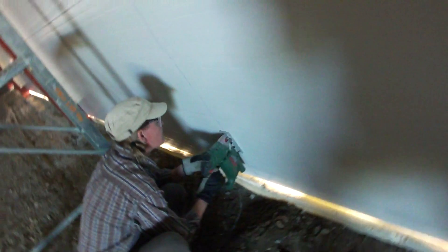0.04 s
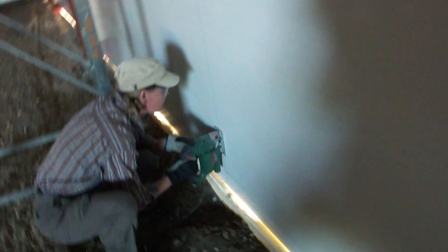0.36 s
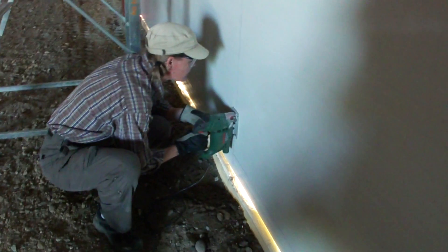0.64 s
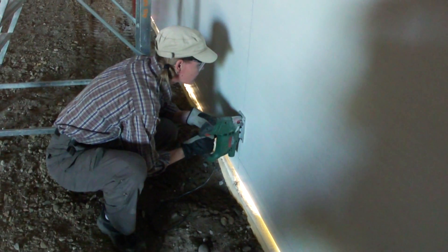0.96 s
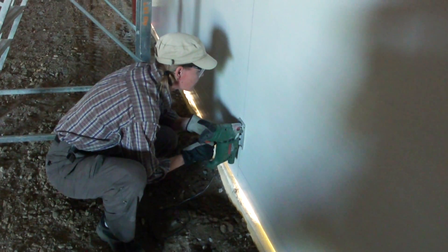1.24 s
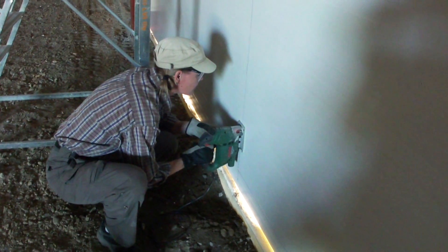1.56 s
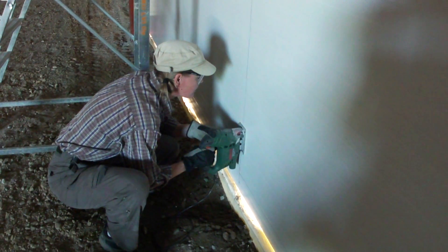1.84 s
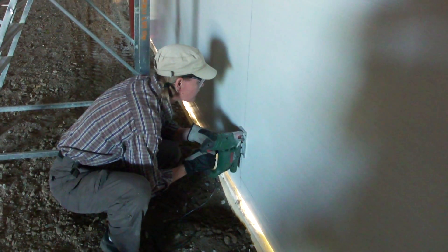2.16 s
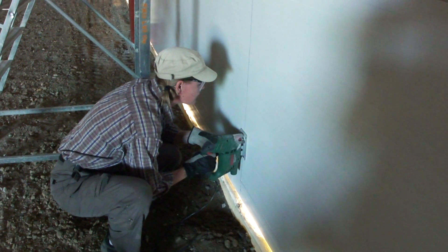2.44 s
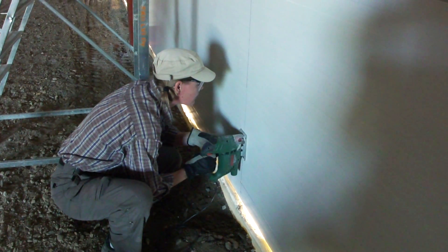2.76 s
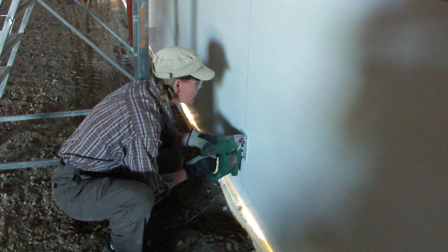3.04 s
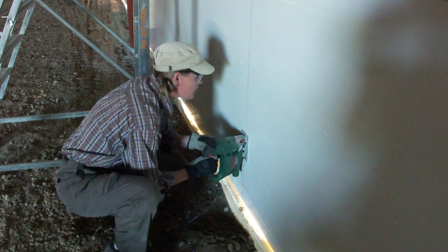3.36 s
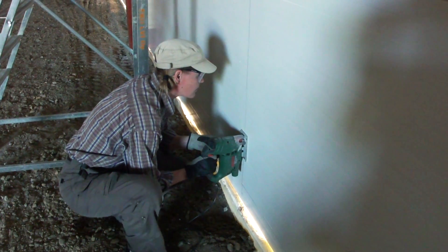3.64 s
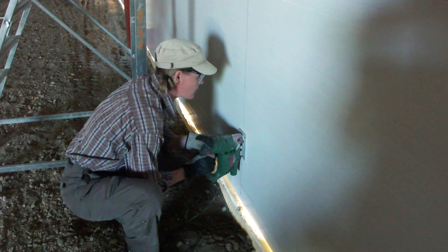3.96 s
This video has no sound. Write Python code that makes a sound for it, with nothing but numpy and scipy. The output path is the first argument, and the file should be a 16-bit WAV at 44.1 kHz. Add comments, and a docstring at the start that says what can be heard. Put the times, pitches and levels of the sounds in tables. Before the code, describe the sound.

A reciprocating power saw cuts a sheet metal wall panel close to the microphone. Its rapid strokes rasp and squeal while the sheet rings and rattles. Near the end the saw speeds up slightly as the load eases.

```python
"""A reciprocating power saw cuts a sheet metal wall panel, close up, at about 46 strokes a second.
Each stroke rasps the teeth through the cut, makes the edge squeal and the blade zing, knocks the saw
against the sheet and keeps the panel ringing. Rattle, hiss and the hum of the saw body fill the gaps.
Near the end the load eases: the saw speeds up a little, the low ring dips and rattle comes forward."""
import sys
import numpy as np
from scipy import signal
from scipy.fft import rfft, irfft, next_fast_len
from scipy.io import wavfile
from scipy.ndimage import uniform_filter1d, map_coordinates

SR = 44100
rng = np.random.default_rng(int(sys.argv[2]) if len(sys.argv) > 2 else 0)


def to_wav(s):
    """Save 16-bit WAV."""
    ch = np.atleast_2d(s).T  # columns
    pcm = np.round(np.clip(ch, -1, 1) * 32767)  # PCM
    wavfile.write(sys.argv[1], SR, pcm.astype(np.int16))


N = 176400

# Pace of the saw: time_s, strokes_per_s
STROKE_RATE = [(0.0, 45.81), (0.45, 45.98), (0.85, 45.81), (1.1, 45.56), (1.38, 45.91), (1.63, 45.43),
               (2.15, 45.87), (2.8, 45.38), (3.05, 45.52), (3.3, 46.45), (3.5, 46.95), (3.7, 47.03),
               (3.88, 46.81), (4.0, 46.29)]
# Faders of the friction layers: time_s, teeth_db, squeal_db, rattle_db, hiss_db
FRICTION_LEVELS = [(.05, -27.5, -26, -25, -30), (.3, -28, -28, -22.5, -28.5),
                   (.65, -28.5, -24.5, -22.5, -30), (.95, -26.5, -24.5, -23.5, -29.5),
                   (1.12, -29, -25.5, -22.5, -32.5), (1.38, -26.5, -27, -21, -29),
                   (1.57, -29.5, -34.5, -23, -30.5), (1.85, -26.5, -33.5, -21, -29),
                   (2.25, -26, -26, -21.5, -28.5), (2.42, -30, -28, -24.5, -31), (2.85, -30, -28, -26, -31),
                   (3.1, -32, -30.5, -22.5, -29), (3.52, -31.5, -52, -19, -25),
                   (3.75, -31, -35, -22, -29.5), (3.87, -25.5, -32, -22, -29), (4, -28, -24.5, -24, -28)]
# Tone of each friction layer: frequency_hz, relative_db
TEETH_EQ = [(1500, -47), (3400, -10), (4600, -14), (5800, -1.5), (6800, -0.5), (7300, -0.5), (8200, 1),
            (9800, -5), (11200, -9), (12800, -56), (14500, -15), (15500, -17.5)]
SQUEAL_EQ = [(1300, -25.5), (1800, -15.5), (2150, -13), (2450, 0.5), (2620, 7.5), (2780, -9.5), (3100, -20),
             (5000, -37)]
RATTLE_EQ = [(20, -42), (65, -47), (130, -29.5), (250, -19), (480, -12.5), (750, -3), (950, 0),
             (1120, -0.5), (1400, -4), (1800, -2), (2200, -5), (2650, -10), (3100, -29), (5000, -26)]
HISS_EQ = [(1500, -27), (3400, -5), (4600, -15), (5800, 3.5), (6800, 1), (8200, 2), (9800, -2), (11200, -9),
           (12800, -31), (14500, -11), (15500, -12)]
# Thin ring of the blade: time_s, level_db, pitch_hz
BLADE_RESONANCE = [(.05, -33, 6320), (.7, -34.5, 6540), (1.2, -43, 6950), (2.1, -39, 6900),
                   (2.4, -33, 6880), (2.9, -35.5, 6800), (3.2, -43, 6850), (4, -52, 6640)]
# Panel resonances as the cut advances: time_s, lower_db, upper_db, lower_pitch_ratio, upper_pitch_ratio
PANEL_MOTION = [(.05, -29, -22, 0.99, 0.93), (.45, -25, -21.5, 1.03, .93), (.95, -18.5, -22, 1.017, 0.997),
                (1.22, -22, -24.5, 1.006, 0.99), (1.45, -16.5, -23, 0.98, 1.01),
                (1.65, -18, -22, 1.033, 1.02), (2.0, -18.5, -23, 0.98, 1.05), (2.28, -19, -20, 1.03, 1.01),
                (2.5, -22, -22, 0.99, 1.02), (2.75, -21.5, -19.5, 1.016, 1), (3.2, -23, -24.5, 1.046, 1.02),
                (3.55, -27, -21.5, 0.92, .96), (3.85, -35, -21.5, 0.97, 0.987), (4, -22, -16.5, 1.02, 1.06)]
# Shape of the panel's two resonance groups: frequency_hz, relative_db
LOWER_RESONANCES = [(500, -39), (640, -18), (780, -15), (865, -5.5), (915, -17.5), (960, -1), (1005, 2.5),
                    (1050, -3.5), (1100, -11.5), (1200, -28)]
UPPER_RESONANCES = [(1080, -26.5), (1140, -16), (1190, -6.5), (1240, -7), (1280, -2), (1325, 3.5),
                    (1375, -4.5), (1420, -8), (1470, -5.5), (1600, -10.5), (1800, -22.5), (2200, -22)]
# Knocks as the teeth bite and in mid stroke: time_s, bite_db, mid_db
KNOCK_LEVELS = [(.05, -47, -24.5), (.3, -50, -24), (.7, -75, -24.5), (1.3, -35, -24), (1.5, -26, -31),
                (1.75, -35, -31), (2.1, -26, -26), (2.3, -22, -23), (2.48, -26, -22.5), (2.7, -23.5, -26),
                (3.03, -23, -33), (3.15, -34, -27), (3.45, -30, -25), (3.65, -47, -21), (4, -42, -22.5)]
# Tone of a knock through the sheet: frequency_hz, relative_db
KNOCK_EQ = [(60, -61), (200, -44), (500, -28.5), (850, -14), (1100, -6.5), (1320, 4), (1550, -5),
            (1900, -17), (2600, -23), (3200, -48.5), (8000, -40.5)]
# Load on the saw: time_s, hum_gain_db, ease_share (0 is full load)
SAW_LOAD = [(.05, -3, 0), (.5, -1, 0.2), (1.2, -0.5, 0.1), (1.5, 0, 0.02), (1.9, 4, 0.1), (2.3, 2, 0.14),
            (2.85, -1, 0.05), (3.2, 2, 0.86), (3.6, -2, 0.95), (4, 1, 0.7)]
# Shaking of the saw body: stroke_harmonic, loaded_db, eased_db
BODY_HARMONICS = [(2, -55, -56.5), (3, -74, -66), (4, -49, -50), (5, -44, -50), (6, -45.5, -61.5),
                  (7, -59, -41), (8, -47.5, -49), (9, -57.5, -53), (10, -49, -43)]
# How alike the two channels sound: frequency_hz, likeness_share
STEREO_LIKENESS = [(100, 1), (1000, 1), (2500, 0.91), (4500, 1), (8000, 0.77), (14000, 0.38)]
# Stereo balance: frequency_hz, left_minus_right_db
STEREO_TILT = [(60, 0), (200, 2), (700, 3), (1290, 2.5), (2380, 0.4), (4400, -1), (8120, 2), (15000, -1)]
# Stereo phase: frequency_hz, left_lead_rad
STEREO_LEAD = [(100, -0.74), (1000, 0.077), (2000, -0.3), (3100, 0.027), (6500, -0.29), (8000, 0.049),
               (11000, -0.41), (15000, -0.87)]
# Gaps in the treble: centre_hz, half_width_hz
TREBLE_NOTCHES = [(3010, 164), (4000, 190), (5010, 202), (12200, 1500), (13500, 1750)]


def tooth_pressure(strokes, peak_at=.48, width=.093, tail_gain=.13, tail_length=.18):
    """The teeth press in once a stroke, a swell with a short tail; timings are shares of a stroke."""
    offset = (strokes - peak_at + .5) % 1 - .5
    swell = np.exp(-(offset / width) ** 2)
    decay = np.exp(-np.mean(np.diff(strokes)) / tail_length)
    tail = signal.lfilter([1 - decay], [1, -decay], swell)
    return unit(np.sqrt(swell + tail_gain * tail))


def roughness(strokes, memory, fresh):
    """Bumps along the blade's path recur stroke after stroke, wear away and blend with fresh noise."""
    bumps = rng.standard_normal((220, 960))  # one row a stroke
    renewal = np.sqrt(1 - memory ** 2)
    worn, _ = signal.lfilter([renewal], [1, -memory], bumps[1:], axis=0, zi=memory * bumps[:1])
    path = map_coordinates(worn.ravel(), [strokes * worn.shape[1]], order=3)
    return np.sqrt(1 - fresh) * unit(path) + np.sqrt(fresh) * rng.standard_normal(N)


def chips(spread_db, samples):
    """Grit: the strength varies from chip to chip, each a few samples long."""
    return amp(spread_db * unit(uniform_filter1d(rng.standard_normal(N), samples)))


def teeth_rasp(strokes, pressure):
    """The teeth scrape through the cut in one bright burst a stroke."""
    scrape = pressure * chips(spread_db=1, samples=24) * roughness(strokes, memory=.824, fresh=.46)
    return unit(colour(scrape, TEETH_EQ))


def edge_squeal(strokes, pressure):
    """The cut edge squeals, rubbed almost the same way on every stroke."""
    rub = (pressure + .15) * roughness(strokes, memory=.98, fresh=.023)
    return unit(colour(rub, SQUEAL_EQ))


def blade_zing(strokes, pressure, width_hz=150):
    """The teeth excite one narrow resonance of the blade, which shifts with the cut."""
    level_db, pitch_hz = curves(BLADE_RESONANCE)
    carrier = np.exp(2j * np.pi * np.cumsum(pitch_hz) / SR)
    decay = np.exp(-np.pi * width_hz / SR)
    drive = pressure * roughness(strokes, memory=.97, fresh=.24)
    ringing = carrier * signal.lfilter([1 - decay], [1, -decay], drive / carrier)
    return amp(level_db) * unit(ringing.real)


def panel_ring(strokes):
    """The sheet rings in two groups of resonances that shift as the cut advances."""
    lower_db, upper_db, lower_ratio, upper_ratio = curves(PANEL_MOTION)
    lower = resonances(strokes, LOWER_RESONANCES, lower_ratio, .74, smear=.352, slip_rad=.4, waver_db=.74)
    upper = resonances(strokes, UPPER_RESONANCES, upper_ratio, .62, smear=.3, slip_rad=.5, waver_db=1.8)
    return amp(lower_db) * lower + amp(upper_db) * upper


def resonances(strokes, shape, ratio, place, smear, slip_rad, waver_db):
    """Stroke harmonics drive the panel, peaking at one place in the stroke, smeared by dispersion."""
    rate_hz = strokes[-1] * SR / N
    peak_hz, _ = max(shape, key=lambda point: point[1])
    ring = np.zeros(N)
    for harmonic in range(11, 46):
        dispersion = smear * (harmonic - peak_hz / rate_hz) ** 2
        phase = 2 * np.pi * harmonic * (strokes - place) + dispersion + rng.standard_normal()
        gain = amp(at_hz(shape, harmonic * rate_hz / ratio) + waver_db * drift(4.9))
        ring += gain * np.cos(phase + slip_rad * drift(1.66))
    return unit(ring)


def knocks(strokes, place, spread_db=1, jitter_s=.00002):
    """The saw hits the sheet once a stroke; place is a share of that stroke."""
    numbers = np.arange(1, int(strokes[-1]))
    softness, lateness = rng.standard_normal((220, 2))[:len(numbers)].T
    hit_sample = np.interp(numbers + place, strokes, np.arange(N)) + lateness * jitter_s * SR
    near = hit_sample.astype(int)[:, None] + np.arange(-8, 9)
    clicks = np.sinc(near - hit_sample[:, None])  # hits land between samples
    blows = amp(-spread_db * softness)[:, None] * clicks
    train = np.bincount(near.ravel(), blows.ravel(), N)[:N]
    return unit(colour(train, KNOCK_EQ))


def loose_rattle(strokes, pressure):
    """Loose midrange rattling runs through the gaps, barely pulsing with the teeth."""
    shake = chips(spread_db=1.5, samples=70) * roughness(strokes, memory=.823, fresh=.81)
    return unit(colour((1 + .068 * pressure) * shake, RATTLE_EQ))


def friction_hiss(strokes):
    """Friction lays a bed of gritty hiss under the whole stroke."""
    grit = chips(spread_db=2.5, samples=40) * roughness(strokes, memory=.86, fresh=.71)
    return unit(colour(grit, HISS_EQ))


def body_hum(strokes, waver_db=.9):
    """The shaking saw body hums low; its harmonics rebalance as the load eases."""
    gain_db, ease = curves(SAW_LOAD)
    hum = np.zeros(N)
    for harmonic, loaded_db, eased_db in BODY_HARMONICS:
        level_db = gain_db + loaded_db + (eased_db - loaded_db) * ease + waver_db * drift(6.2)
        hum += np.sqrt(2) * amp(level_db) * np.cos(2 * np.pi * (harmonic * strokes + rng.random()))
    return hum


def stereo_scatter(mono):
    """Scatter from nearby surfaces widens the sound, mostly in the treble."""
    size = next_fast_len(N + 4096)
    hz = np.fft.rfftfreq(size, 1 / SR)
    reflections = rfft(rng.standard_normal(1500) * np.exp(-np.arange(1500) / 450), size)
    scatter = 1j * reflections / (abs(reflections) + 1e-9)  # phase only
    likeness = at_hz(STEREO_LIKENESS, hz)
    mid = np.sqrt((1 + likeness) / 2)
    side = np.sqrt((1 - likeness) / 2) * scatter
    lean = amp(at_hz(STEREO_TILT, hz) / 2) * np.exp(.5j * at_hz(STEREO_LEAD, hz))
    channels = np.array([(mid + side) * lean, (mid - side) / lean])
    return irfft(rfft(mono, size) * channels, size)[:, :N]


def amp(db):
    """Decibels to gain."""
    return 10 ** (np.asarray(db) / 20)


def unit(x):
    """Scales to rms 1."""
    return x / np.sqrt(np.mean(x ** 2) + 1e-20)


def curves(table):
    """One automation curve for each value column of a time table."""
    time_s, *columns = np.transpose(table)
    return [np.interp(np.arange(N) / SR, time_s, column) for column in columns]


def at_hz(points, hz):
    """Reads a spectrum on a log-frequency axis."""
    points_hz, values = np.transpose(points)
    return np.interp(np.log(hz + 1), np.log(points_hz + 1), values)


def colour(x, eq):
    """Minimum-phase EQ: nothing rings ahead of a hit."""
    hz = abs(np.fft.fftfreq(4096, 1 / SR))
    log_gain = np.log(amp(at_hz(eq, hz)))
    response = np.exp(np.conj(signal.hilbert(log_gain)))
    return signal.oaconvolve(x, np.fft.ifft(response).real[:2048])[:N]


def drift(cutoff_hz):
    """Slow random wander, rms about 1."""
    control_hz = 200
    hz = np.fft.rfftfreq(2048, 1 / control_hz)
    slow = unit(irfft(rfft(rng.standard_normal(2048)) / (1 + (hz / cutoff_hz) ** 4)))
    return np.interp(np.arange(N) / SR * control_hz, np.arange(2048), slow)


def scene(start_s=.0393, fade_in_s=.011, opening_boost_db=6, settle_s=.096):
    """The sound cuts in on the running saw, briefly louder, then the level settles."""
    strokes = np.cumsum(curves(STROKE_RATE)[0]) / SR  # one stroke count drives every layer
    pressure = tooth_pressure(strokes)
    bite_db, mid_db = curves(KNOCK_LEVELS)
    teeth_db, squeal_db, rattle_db, hiss_db = curves(FRICTION_LEVELS)
    mix = panel_ring(strokes)
    mix += amp(bite_db) * knocks(strokes, place=.305)
    mix += amp(mid_db) * knocks(strokes, place=.465)
    mix += amp(teeth_db) * teeth_rasp(strokes, pressure)
    mix += amp(squeal_db) * edge_squeal(strokes, pressure)
    mix += amp(rattle_db) * loose_rattle(strokes, pressure)
    mix += amp(hiss_db) * friction_hiss(strokes)
    mix += blade_zing(strokes, pressure) + body_hum(strokes)
    elapsed_s = np.maximum(np.arange(N) / SR - start_s, 0)
    fade_in = np.minimum(elapsed_s / fade_in_s, 1) ** 2
    settling_gain = amp(opening_boost_db * np.exp(-elapsed_s / settle_s))
    return stereo_scatter(fade_in * settling_gain * mix)


def record(dry, low_cut_hz=65, ceiling=.95, high_cut_hz=15900):
    """Master chain: low cut, soft ceiling, treble notches, steep high cut."""
    mix = signal.sosfilt(signal.butter(4, low_cut_hz, "highpass", fs=SR, output="sos"), dry)
    mix = mix / (1 + (mix / ceiling) ** 8) ** (1 / 8)
    for centre_hz, half_width_hz in TREBLE_NOTCHES:
        b, a = signal.iirnotch(centre_hz, centre_hz / (2 * half_width_hz), fs=SR)
        mix = signal.lfilter(b, a, mix)
    high_cut = signal.firwin(511, high_cut_hz, window=("kaiser", 9), fs=SR)
    return signal.oaconvolve(mix, high_cut[None], "same")


dry = scene()
out = record(dry)
to_wav(out)
```